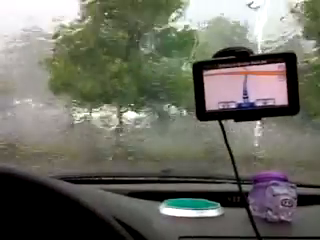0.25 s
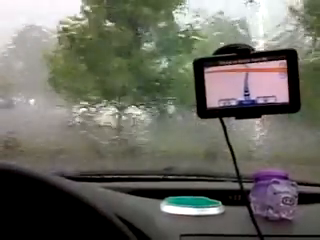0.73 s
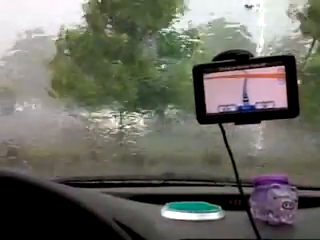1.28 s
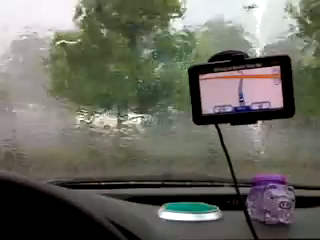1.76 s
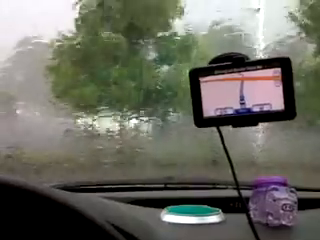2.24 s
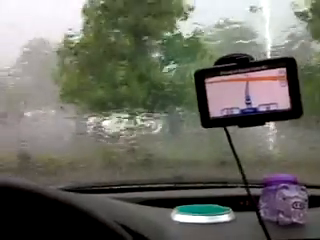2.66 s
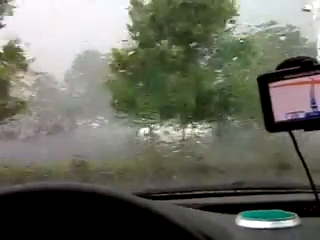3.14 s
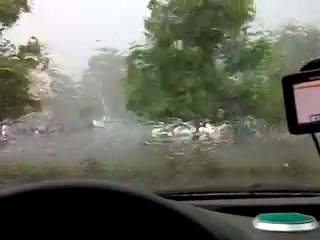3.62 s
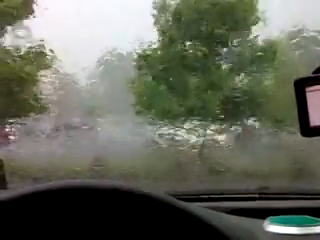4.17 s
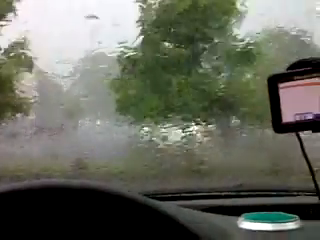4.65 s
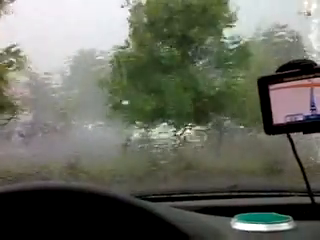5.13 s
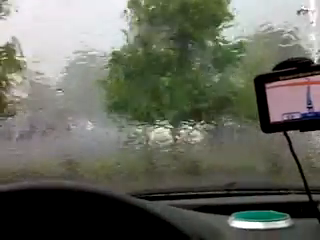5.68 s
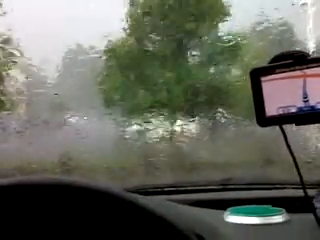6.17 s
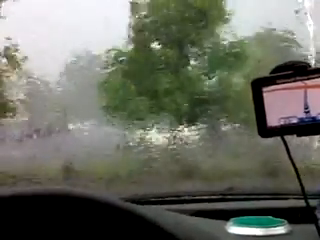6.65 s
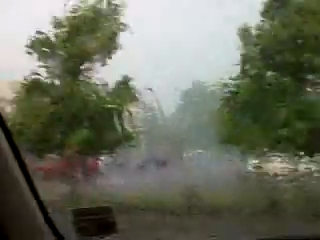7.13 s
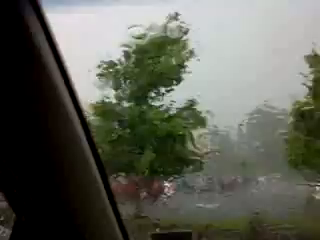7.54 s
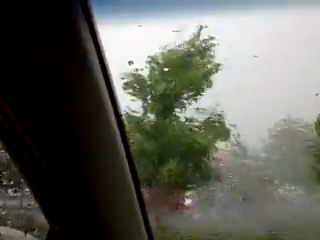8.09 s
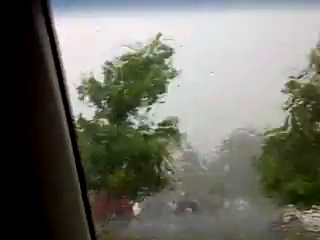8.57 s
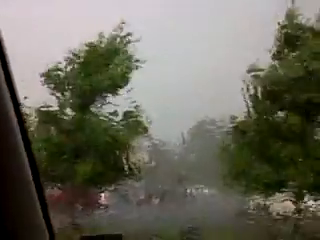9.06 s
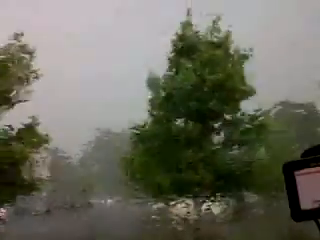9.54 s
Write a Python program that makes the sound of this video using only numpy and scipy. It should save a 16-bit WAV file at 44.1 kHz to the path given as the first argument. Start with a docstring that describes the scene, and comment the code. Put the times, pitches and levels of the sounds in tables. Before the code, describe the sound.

From the front seat, heavy hail clatters on glass and sheet metal, with wet crunchy bursts, hollow clonks and a low steady storm rumble.

```python
"""A dull storm roar and a fine patter, then at once hailstones cracking on a parked car, from the front seat.
Big stones crack on the windshield, thud lower and longer on the roof, clonk on the bonnet: noise-excited modes.
Wet lumps burst on the glass as showers of crumbs; one stone knocks a short woody note off the trim.
Small stones and raindrops patter with the downpour, which drops sharply near 7 s and is strongest at the end.
The roar is steady filtered noise."""
import sys
import numpy as np
from scipy import signal
from scipy.fft import rfft, irfft
from scipy.io import wavfile

SR = 44100
rng = np.random.default_rng(int(sys.argv[2]) if len(sys.argv) > 2 else 0)


def store_pcm(level_fs):
    """Save levels as 16-bit WAV."""
    pcm = np.round(np.clip(level_fs, -1, 1) * 32767).astype(np.int16)
    wavfile.write(sys.argv[1], SR, np.atleast_2d(pcm).T)


N = 432621  # length in samples

# storm through the closed body, relative spectrum: f/Hz, density/dB
WASH_SPECTRUM = [(24, 19), (34, -9.5), (47, 19), (64, 4.5), (450, 7.5), (1800, -4.5), (4000, -12),
                 (7000, -32)]
# downpour strength, relative: t/s, level/dB
DOWNPOUR = [(0, 2.5), (2.7, -6), (4.2, 1), (5, -2), (6.9, 7), (7.25, -21.5), (7.6, 0.5), (9.8, 9)]
# crowded panel modes, relative strength: f/Hz, density/dB
GLASS_MODES = [(60, -22), (140, -8.5), (900, -7.5), (2000, -6), (3250, 0), (4050, -6), (4800, -6.5),
               (7000, -23)]
ROOF_MODES = [(60, -19), (105, -8.5), (142, 6), (215, -4.5), (275, -1.5), (470, 4), (740, -1.5), (980, 0),
              (1800, -9), (3400, -10.5), (7000, -28.5)]
# panel ring time: f/Hz, t60/s
GLASS_T60 = [(300, 0.23), (1700, 0.077), (5500, 0.027)]
ROOF_T60 = [(200, 0.42), (900, 0.35), (4000, 0.082)]
# big stones on the bonnet, before STEEL_DB: t/s, level/dB, pitch of the spot struck f/Hz
BONNET_HITS = [(0.044, -31.5, 935), (2.434, -27, 444.5), (2.8, -32.5, 1055), (4.091, -26, 966),
               (4.956, -21.5, 1180), (5.294, -25.5, 499), (5.941, -27.5, 516), (7.005, -25.5, 484),
               (7.549, -26.5, 483), (7.79, -23, 512), (7.937, -28, 703), (8.074, -23, 620),
               (8.223, -26, 749), (8.514, -22, 592), (9.205, -27.5, 560)]
# big stones on the roof, before STEEL_DB: t/s, level/dB, hardness as treble tilt/(dB/octave)
ROOF_HITS = [(0.115, -29.5, 1.5), (0.397, -28, 1.5), (0.682, -25, -0.5), (1.152, -31.5, 1),
             (1.444, -29.5, 5), (1.584, -32, 4), (1.779, -33, 2.5), (1.994, -26.5, -0.5),
             (2.067, -28.5, 1.5), (3.114, -25.5, -4), (3.268, -25.5, -1.5), (3.72, -27, 0.5),
             (4.396, -35.5, 2), (4.485, -22, 2), (4.752, -31, 2.5), (4.902, -30, -3), (4.919, -26, -1.5),
             (5.419, -29.5, 1), (5.752, -28.5, 2.5), (6.194, -21.5, 3.5), (6.28, -27, -1),
             (6.725, -27.5, 1.5), (6.757, -27, -2.5), (6.947, -25, -1), (7.425, -28.5, 2),
             (7.731, -27, 5.5), (8.028, -27.5, 4.5), (8.272, -26, -2), (8.304, -24.5, 2), (8.493, -23, 4.5),
             (8.699, -26, 0), (8.777, -29.5, 1.5), (8.835, -29, -11), (9.175, -30, 1.5),
             (9.315, -28.5, 4.5), (9.387, -25.5, -0.5), (9.624, -28, 6), (9.671, -24, 2.5)]
# wet, half-melted lumps bursting on the windshield, before GLASS_DB: t/s, level/dB
SPLATS = [(0.765, -28.5), (1.054, -21), (1.486, -28), (2.19, -32.5), (3.03, -25.5), (3.1, -22.5),
          (3.178, -27), (3.35, -29), (3.65, -30), (4.2, -33.5), (4.42, -22.5), (4.545, -26), (4.613, -28),
          (5.028, -19.5), (5.95, -19), (6.047, -22), (6.105, -30), (6.325, -17), (6.553, -19.5),
          (6.815, -26.5), (7.175, -32.5), (7.25, -34.5), (8.12, -26), (8.605, -19.5), (9.11, -17.5),
          (9.37, -20)]
# big stones on the windshield, before GLASS_DB: t/s, level/dB, hardness as treble tilt/(dB/octave)
GLASS_HITS = [(0.065, -24, -2), (0.088, -24.5, 6), (0.118, -21, 2.5), (0.229, -19.5, 1),
              (0.336, -29.5, 1.5), (0.635, -23, 2), (0.815, -32, 3), (0.892, -22.5, -4),
              (1.139, -13.5, -0.5), (1.253, -26.5, 3.5), (1.402, -23.5, 6), (1.512, -17.5, 3.5),
              (1.661, -23, 1), (1.694, -19, 4), (1.71, -19, 0), (1.742, -24.5, 8), (1.842, -16, -3),
              (1.932, -14.5, 1.5), (2.031, -26.5, 4), (2.248, -28, 1), (2.417, -23, 0), (2.431, -16.5, 0.5),
              (2.54, -25.5, -1), (2.562, -21, -1.5), (2.791, -20.5, -2), (2.802, -19.5, -5.5),
              (2.84, -20, 10), (3.016, -22, 3.5), (3.262, -22.5, 7.5), (3.512, -19.5, -7.5),
              (3.535, -27, 7), (3.722, -21, -1.5), (3.893, -21.5, 1.5), (4.074, -20.5, 4), (4.334, -13, 2),
              (4.356, -12.5, 3), (4.481, -19, -0.5), (4.666, -25, 8), (4.717, -20, 4.5), (4.823, -22.5, -1),
              (4.888, -15.5, -0.5), (4.911, -12, -6.5), (5.1, -18, -1.5), (5.165, -17.5, 1),
              (5.248, -20.5, 2.5), (5.355, -24, 3), (5.495, -23.5, -4), (5.588, -25.5, 5.5),
              (5.686, -12, 3), (5.846, -17, 6), (6.007, -13, 1.5), (6.232, -14.5, -2), (6.289, -26, 14),
              (6.375, -22.5, 18), (6.47, -15.5, 3.5), (6.517, -12, -0.5), (6.627, -18, 13),
              (6.684, -15.5, 5.5), (6.704, -22, 8), (6.906, -19, 1), (7.094, -23, 0.5), (7.35, -21.5, -0.5),
              (7.386, -20.5, -3.5), (7.404, -19.5, -2), (7.46, -15.5, -2.5), (7.609, -30.5, 4),
              (7.673, -26, 10), (7.897, -26, -2.5), (7.98, -18, -6.5), (8.27, -16, 6.5), (8.341, -23, 14),
              (8.366, -23, 9), (8.41, -28.5, 4), (8.645, -23, -5.5), (8.74, -27, -3), (8.845, -24, 11),
              (8.911, -22, 9), (8.938, -20, 0), (8.961, -30, 14), (8.993, -21.5, 9), (9.095, -20, 8),
              (9.419, -22, -9), (9.457, -20, -4), (9.501, -15.5, 11), (9.517, -22, -0.5), (9.559, -20.5, 4),
              (9.695, -12.5, -3.5), (9.724, -18.5, 4)]

# gains: wash; big stones and lumps on glass; big stones on roof and bonnet
WASH_DB, GLASS_DB, STEEL_DB = -47, -4.5, 1.5
# patter at 0 dB downpour: small stones on glass, raindrops on glass, small stones on roof
TICKS_DB, SPATTER_DB, TAPS_DB = -47, -53, -41.5
TICKS_PER_S, SPATTER_PER_S, TAPS_PER_S = 55, 110, 45
GLASS_GROWTH_DB_PER_DB = 1.7  # the windshield faces the gusts: its patter follows the downpour more steeply
GLASS_SPREAD_DB, ROOF_SPREAD_DB = 25, 30.5  # smallest to largest piece of patter
RAIN_TILT_DB_PER_OCT = 4.7  # brief contact: mostly the highest glass modes answer
# crumb shower, before the glass rings on
BURST_S, CRUMBS_PER_S, CRUMB_TILT_DB_PER_OCT = 0.033, 700, 3.9
CRUMBS_DB = -15  # crumbs of a big stone, re its crack
BONNET_SLOPE_DB_PER_OCT = 8.5  # cluster falls away on both sides of the pitch
NOTE_SHARE = 0.22  # nominal share of a clonk's power in its clear note, 0-1
KNOCK_S, KNOCK_LENGTH_S, KNOCK_HZ, KNOCK_DB = 1.018, 0.0078, 1850, -30
LEAD_S = 0.012  # room for a blow to swell before its nominal time
EDGE_HZ = 7380  # output low-pass


def gain_of(db):
    """Decibels to amplitude."""
    return np.exp(np.asarray(db) * (np.log(10) / 20))


def evened(x):
    """Scales each row to rms 1."""
    return x / np.sqrt(np.mean(x ** 2, axis=-1, keepdims=True) + 1e-20)


def read(points, hz):
    """Interpolates (Hz, value) points on a log-frequency axis."""
    f, value = np.transpose(points)
    return np.interp(np.log(hz + 1), np.log(f + 1), value)


def add(mix, s, sound):
    """Mixes a sound in at time s."""
    part = mix[max(round(s * SR), 0):][:len(sound)]
    part += sound[:len(part)]


def wash():
    """Countless far drops and the storm's rumble merge into a dull roar: shaped noise."""
    spectrum = rfft(rng.standard_normal(N))
    colour_db = read(WASH_SPECTRUM, np.fft.rfftfreq(N, 1 / SR))
    return evened(irfft(spectrum * gain_of(colour_db), N))


def edge_echoes(count, hz, depth_db, longest_s, order=4):
    """Waves thrown back from the panel edges ripple the spectrum, differently for every spot struck."""
    delay, phase = rng.random((2, count, order, 1))
    ripples = np.cos(2 * np.pi * (hz * delay * longest_s + phase))
    return depth_db * ripples.sum(1) / np.sqrt(order)


def ring(colour_db, t60, rise_s, hold_s, crack, lumpy_db):
    """One blow per row of colour_db: each spot gives the crowded modes their own size and phase."""
    count, size = len(colour_db), 2 * (colour_db.shape[1] - 1)
    t, hz = np.arange(size) / SR - LEAD_S, np.fft.rfftfreq(size, 1 / SR)
    dying_s = np.maximum(t - hold_s, 0)  # first cabin reflections hold the level up
    noise = rfft(rng.standard_normal((count, size)))
    modes = rfft(evened(irfft(noise * gain_of(colour_db))))
    centres_hz = np.geomspace(150, 6000, 6)
    sound = 0
    for centre_hz, pick in zip(centres_hz, np.eye(len(centres_hz))):  # high modes die first
        band = irfft(modes * read(np.c_[centres_hz, pick], hz))
        # waves return from the rim in bunches: lumpy decay
        lumps = signal.resample(rng.standard_normal((count, size // 512)), size, axis=1)
        decay = np.exp(-np.log(1000) * dying_s / read(t60, centre_hz))
        sound = sound + band * gain_of(lumpy_db * lumps) * decay
    # bending waves spread out as they travel: a farther blow swells more slowly
    swell_s = rise_s * 2 ** rng.uniform(0.096, 1, (count, 1))
    onset = (1 + np.tanh(t / swell_s)) / 2
    first_wave = 1 + crack * np.exp(-abs(t) / hold_s)  # strongest from the point of impact
    return sound * onset * first_wave


def strike_glass(tilt_db_per_oct, size=6144):
    """Short bright cracks of laminated glass; a harder stone has a briefer contact and more treble."""
    hz = np.fft.rfftfreq(size, 1 / SR)
    octaves = np.log2(np.clip(hz, 1100, 6000))
    spot_db = edge_echoes(len(tilt_db_per_oct), hz, depth_db=4.0, longest_s=0.001451)
    colour_db = read(GLASS_MODES, hz) + np.outer(tilt_db_per_oct, octaves) + spot_db
    return ring(colour_db, GLASS_T60, rise_s=0.0017, hold_s=0.0046, crack=0.52, lumpy_db=0.0)


def strike_roof(tilt_db_per_oct, size=16384):
    """Thuds of lined sheet steel; the whole panel booms just overhead."""
    hz = np.fft.rfftfreq(size, 1 / SR)
    octaves = np.log2(np.clip(hz, 600, 4800))
    spot_db = edge_echoes(len(tilt_db_per_oct), hz, depth_db=2.0, longest_s=0.011)
    colour_db = read(ROOF_MODES, hz) + np.outer(tilt_db_per_oct, octaves) + spot_db
    return ring(colour_db, ROOF_T60, rise_s=0.0032, hold_s=0.018, crack=0.51, lumpy_db=2.5)


def burst(count, tilt_db_per_oct):
    """Wet ice falls apart on the glass: a crunchy crumb shower that swells quickly and thins out."""
    t = np.arange(0, BURST_S, 1 / SR)
    force, chance = rng.random((2, count, len(t)))
    landed = chance < CRUMBS_PER_S / SR
    crumbs = (force - 0.5) * landed * np.sin(np.pi * np.sqrt(t / BURST_S))
    cracks = strike_glass(np.full(count, tilt_db_per_oct))
    return signal.fftconvolve(evened(crumbs) / np.sqrt(len(t)), cracks, axes=1)


def patter(spots, per_s, spread_db):
    """Small stones or drops of random size land at random times on random spots of a panel."""
    out = np.zeros(N)
    for when, where, size in rng.random((round(per_s * N / SR), 3)):
        spot = spots[int(where * len(spots))]
        add(out, when * N / SR, gain_of(spread_db * size ** 2) * spot)
    return evened(out)


def small_hail_and_rain(count=32):
    """Ticks, rain spatter and roof taps follow the downpour, the glass more steeply than the roof."""
    downpour_db = np.interp(np.arange(N) / SR, *np.transpose(DOWNPOUR))
    hardness = rng.standard_normal(count)
    ticks = patter(strike_glass(4 * hardness), TICKS_PER_S, GLASS_SPREAD_DB)
    # raindrops splash so thickly that they run together into a rough hiss
    spatter = patter(burst(count, RAIN_TILT_DB_PER_OCT), SPATTER_PER_S, GLASS_SPREAD_DB)
    taps = patter(strike_roof(2 * hardness), TAPS_PER_S, ROOF_SPREAD_DB)
    glass = gain_of(TICKS_DB) * ticks + gain_of(SPATTER_DB) * spatter
    return glass * gain_of(GLASS_GROWTH_DB_PER_DB * downpour_db) + taps * gain_of(TAPS_DB + downpour_db)


def knock():
    """One stone gives a short woody note off a piece of trim: a sine under a quick swell."""
    t = np.arange(0, KNOCK_LENGTH_S, 1 / SR)
    swell = np.sin(np.pi * np.sqrt(t / KNOCK_LENGTH_S))
    out = np.zeros(N)
    add(out, KNOCK_S, gain_of(KNOCK_DB) * swell * np.sin(2 * np.pi * KNOCK_HZ * t))
    return out


def strike_bonnet(pitch_hz, size=16384):
    """Hollow clonks of bare steel outside the cabin: one clear note in a cluster of weaker modes."""
    pitch_hz = pitch_hz[:, None]
    octaves = np.log2((np.fft.rfftfreq(size, 1 / SR) + 1) / pitch_hz)
    colour_db = -BONNET_SLOPE_DB_PER_OCT * abs(octaves)
    cluster = ring(colour_db, ROOF_T60, rise_s=0.0011, hold_s=0.0072, crack=0.26, lumpy_db=2.0)
    t = np.maximum(np.arange(size) / SR - LEAD_S, 0)
    decay = np.exp(-np.log(1000) * t / read(ROOF_T60, pitch_hz))
    note = np.sin(2 * np.pi * pitch_hz * t) * decay
    return np.sqrt(1 - NOTE_SHARE) * cluster + np.sqrt(2 * NOTE_SHARE) * note


def splat():
    """Each wet lump bursts into its own crumb shower."""
    return burst(len(SPLATS), CRUMB_TILT_DB_PER_OCT)


def shatter(tilt_db_per_oct):
    """A big stone cracks on the glass, and its crumbs rattle after it."""
    crack = strike_glass(tilt_db_per_oct)
    crumbs = burst(len(tilt_db_per_oct), CRUMB_TILT_DB_PER_OCT)
    crumbs = np.roll(crumbs, round(LEAD_S * SR / 2))  # delayed by half the lead
    return crack + gain_of(CRUMBS_DB) * crumbs[:, :crack.shape[1]]


def hail(rows, strike):
    """Places big stones or lumps, each with its own time, force and, if listed, colour."""
    times, level_db, *colour = np.transpose(rows)
    out = np.zeros(N)
    for s, db, blow in zip(times, level_db, strike(*colour)):
        add(out, s - LEAD_S, gain_of(db) * blow)  # swell starts before the nominal time
    return out


def scene():
    """Wash, patter and knock under the big blows on steel and glass."""
    background = gain_of(WASH_DB) * wash() + small_hail_and_rain()
    steel = hail(BONNET_HITS, strike_bonnet) + hail(ROOF_HITS, strike_roof)
    windshield = hail(SPLATS, splat) + hail(GLASS_HITS, shatter)
    blows = gain_of(STEEL_DB) * steel + gain_of(GLASS_DB) * windshield
    return (background + knock() + blows)[None]


def record(dry, ceiling=0.48):
    """Rounds off the tallest peaks with tanh, then low-passes to a narrow band."""
    low_pass = signal.firwin(601, EDGE_HZ, window=("kaiser", 9), fs=SR)
    rounded = ceiling * np.tanh(dry / ceiling)
    return signal.oaconvolve(rounded, low_pass[None], "same")


dry = scene()
out = record(dry)
store_pcm(out)
```